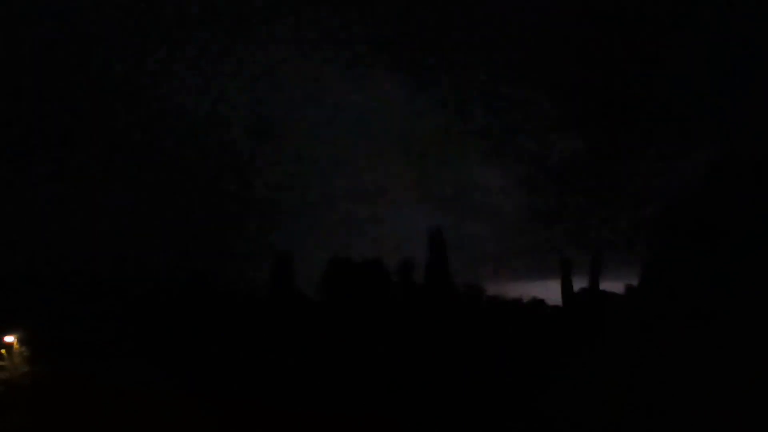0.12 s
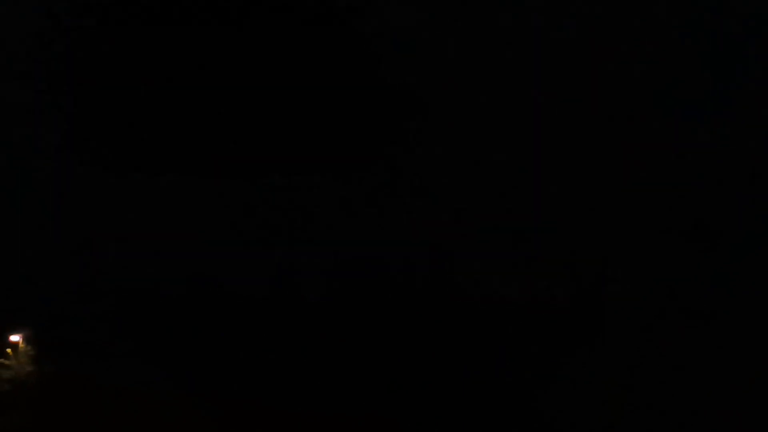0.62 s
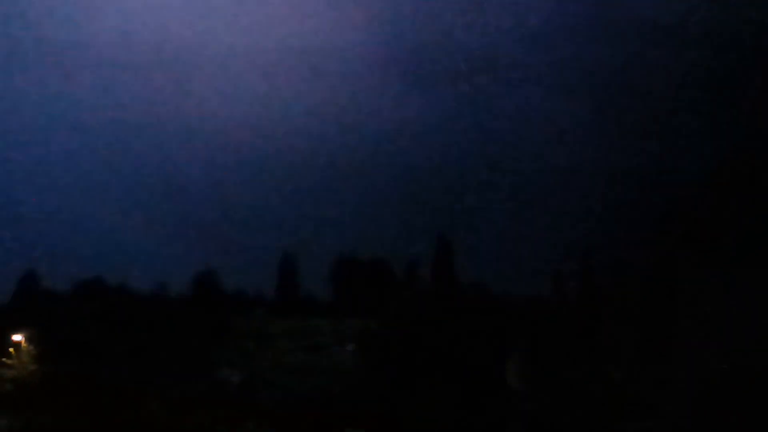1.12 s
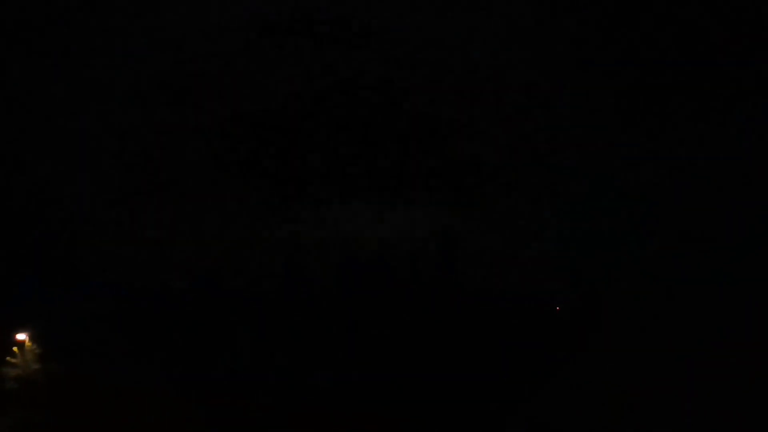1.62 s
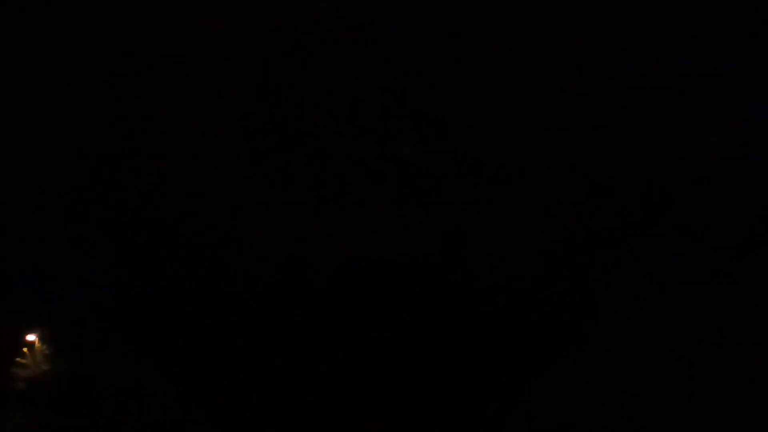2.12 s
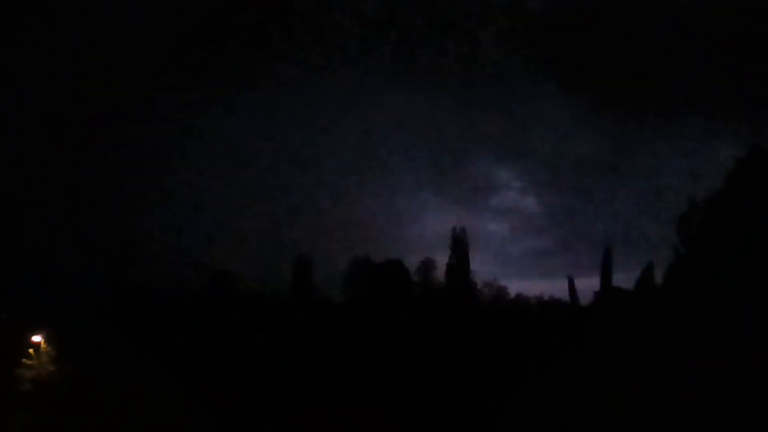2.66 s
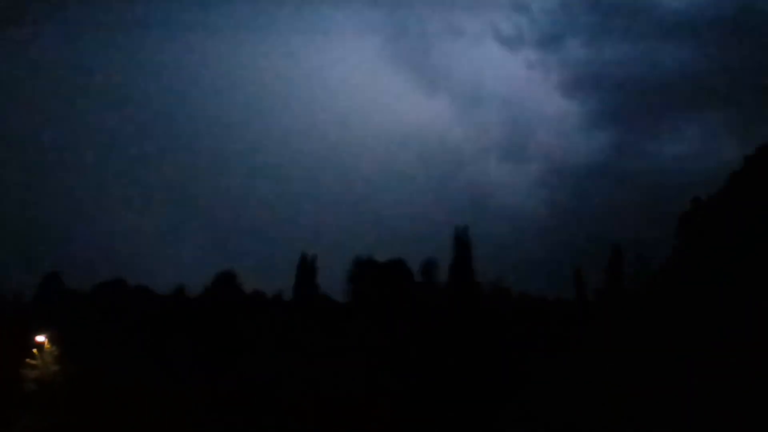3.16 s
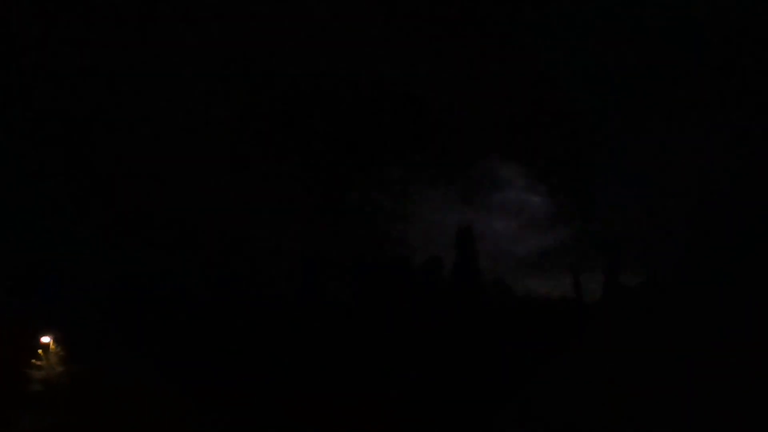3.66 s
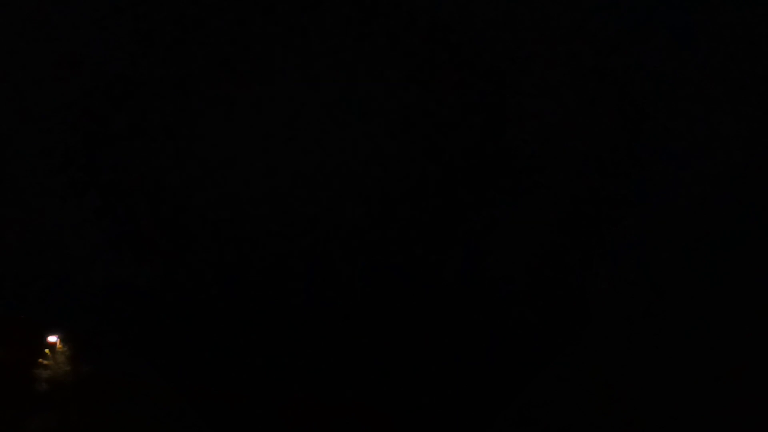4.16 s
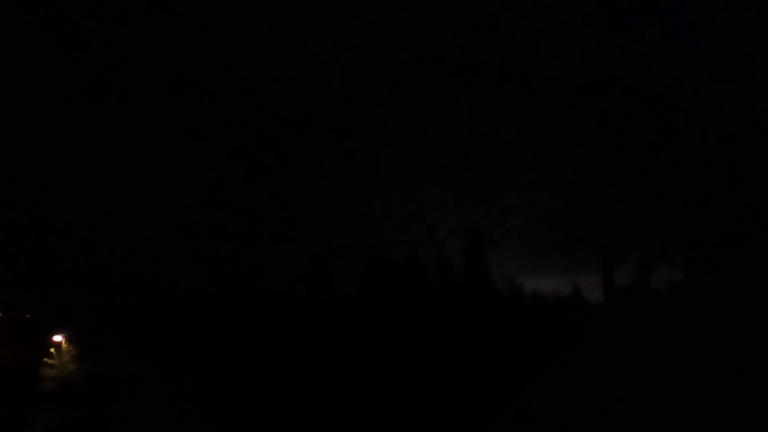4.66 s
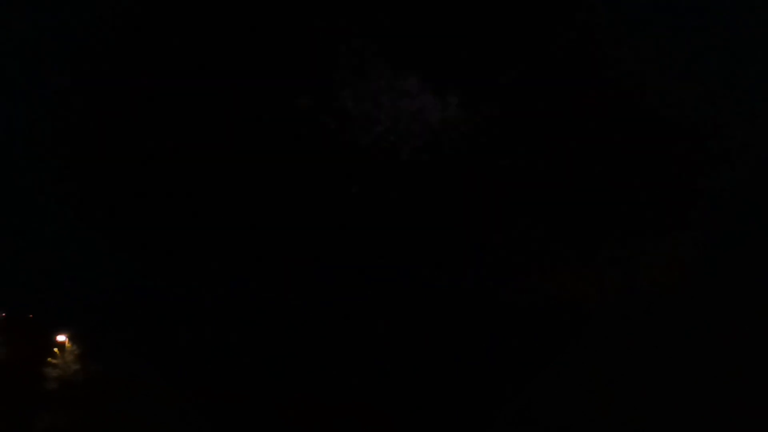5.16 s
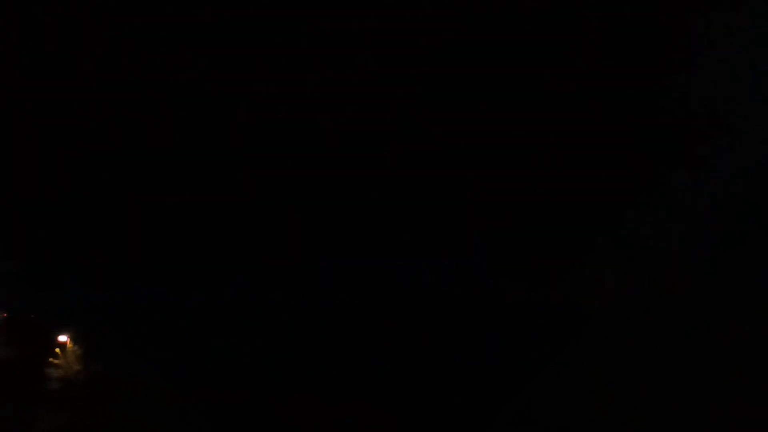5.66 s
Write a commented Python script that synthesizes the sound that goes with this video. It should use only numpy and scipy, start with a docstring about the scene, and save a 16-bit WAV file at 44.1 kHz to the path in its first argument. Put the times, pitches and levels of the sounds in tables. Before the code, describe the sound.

Distant thunder over open country at night, heard in stereo and somewhat stronger on the left. From 0 s a deep, muffled roll is already under way, with rounded booms crowding together and strongest around 0.6-1.0 s. It eases to a lower grumble from about 1.2 to 2.3 s, swells again at 2.5-3.0 s with fuller, slightly brighter rumbling, sinks, then thumps at 4.0 s and rolls heavily from 4.5 to 5.3 s before fading slightly towards 5.8 s. No sharp cracks. A thin, quiet, nearly steady hiss of leaves and far rain runs throughout. Very close, small dry ticks and rustles cluster at 0.2-0.85 s, then scatter from 1.3 to 4.2 s, including a crisper rustle near 3.9 s. A very high insect flutter puffs briefly at 1.85 s, a fainter fast trill follows on the left at 1.95-2.3 s, and the first returns around 4.9 s.

```python
"""Far thunder over open country at night, heard by two microphones a step apart.
From the start, random shocks from the long lightning channel, dulled by kilometres of air, make a slow roll
with separate booms, stronger on the left; beside it lies a thin noise hiss of leaves and far rain.
From 0.2 s small ticks and rustles sound close by, each a noisy ring with a snap and a knock.
An insect puffs high resonant noise at 1.8 s, a fainter one trills on the left at 2 s, the first returns at 4.9 s."""
import sys
import numpy as np
from scipy import signal
from scipy.fft import rfft, irfft
from scipy.io import wavfile
from scipy.ndimage import uniform_filter1d

SR = 44100
rng = np.random.default_rng(int(sys.argv[2]) if len(sys.argv) > 2 else 0)


def rack_gain(trim_db):
    """Turn a fader trim in dB into the linear factor to multiply a signal by."""
    fader = np.asarray(trim_db, float)
    return 10 ** (fader / 20)


def put_to_file(sound):
    """Save the sound as 16-bit audio at rate SR, in the file named by the first command-line argument."""
    columns = np.atleast_2d(sound).T  # one column per channel
    safe = np.clip(columns, -1, 1)
    whole_steps = np.round(safe * 32767)
    wavfile.write(sys.argv[1], SR, whole_steps.astype(np.int16))


N = 255339
HZ = np.maximum(np.fft.rfftfreq(N, 1 / SR), 1)
T = np.arange(N) / SR


def rms_one(x):
    """Scales a sound to an rms of 1."""
    return x / np.sqrt(np.mean(x ** 2) + 1e-20)


def in_time(rows):
    """Draws every column of a table against its first, the time, as a line over the whole scene."""
    s, *columns = np.transpose(rows)
    return [np.interp(T, s, column) for column in columns]


def over_hz(points):
    """Turns a table of (frequency [Hz], gain [dB]) into a gain at every frequency."""
    hz, db = np.transpose(points)
    return rack_gain(np.interp(np.log(HZ), np.log(hz), db))


def colour(x, gain):
    """Filters a sound by a gain at every frequency."""
    return irfft(rfft(x) * gain, N)


def drift(rate):
    """Chance line through 'rate' random knots a second, the knots of spread 1."""
    knots = rng.standard_normal(int(N / SR * 40) + 2)
    return np.interp(T * rate, np.arange(len(knots)), knots)


def resonate(x, hz, width_hz):
    """Rings a two-pole resonance of the given pitch and width."""
    radius = np.exp(-np.pi * width_hz / SR)
    top = (1 - radius ** 2) / 2
    poles = [1, -2 * radius * np.cos(2 * np.pi * hz / SR), radius ** 2]
    return signal.lfilter([top, 0, -top], poles, x + 1e-18)


def panned(x, left_db):
    """Places a sound by the level of left over right."""
    return x * rack_gain(np.array([[left_db / 2], [-left_db / 2]]))


def evened(x, share, over_s):
    """Rms 1, with a share of the chance swells over some time span flattened."""
    power = uniform_filter1d(np.mean(x ** 2, axis=0), size=max(int(over_s * SR), 1))
    return rms_one(x / (np.abs(power) + 1e-20) ** (share / 2))


def shocks():
    """Every kink of the channel sends one shock of its own size and sign."""
    shocks_per_s, spread_db = 1600, 2.5
    sizes = rack_gain(spread_db * np.minimum(rng.exponential(1, N), 4))
    signs = rng.choice([-1, 1], N)
    arrives = rng.random(N) < shocks_per_s / SR
    return rms_one(sizes * signs * arrives)


def levels():
    """Gain of each of five parts of the thunder: the slow roll plus the booms, summed as power."""
    # the slow roll: (time [s], body [dB], deep part over body [dB], bright part over body [dB],
    # top edge over body [dB])
    roll = [(0.0, -35.5, 0.5, -5, -13), (0.76, -35, -0.5, -9.5, -8.5), (1.05, -34.5, 1.5, -6.5, -17),
            (1.26, -36.5, 2.5, -16, -15.5), (1.5, -34, -1.5, -7.5, -8), (2.19, -35.5, 0, -9, -19),
            (2.61, -25.5, -4, -4, -17), (3.26, -34, -3.5, -6.5, -17.5), (3.55, -33, -1.5, -4, -19.5),
            (3.82, -36.5, 1.5, -6.5, -16.5), (4.15, -33, 0.5, -11.5, -18), (4.58, -33, -0.5, -12, -13.5),
            (4.97, -33.5, -3, -10.5, -13.5), (5.31, -33.5, -0.5, -5.5, -16.5), (5.73, -35.5, -1, -8.5, -19),
            (5.79, -39.5, -14, -6, -11)]
    # booms out of the roll: (time of the crest [s], level [dB], centre [Hz], length [ms])
    booms = [(.05, -27.5, 144, 33), (.05, -41, 750, 75), (.14, -26, 56, 63), (.2, -41, 420, 20),
             (.35, -28, 110, 49), (0.877, -26, 246, 24), (0.931, -28.5, 200, 23), (2.8, -43, 450, 49),
             (3.09, -37, 497, 99), (3.5, -45, 394, 42), (.48, -27, 127, 44), (0.611, -23, 50.7, 38),
             (.78, -22.5, 70, 31), (0.899, -21, 129, 32), (1.42, -29.5, 170, 28), (1.52, -42, 700, 31),
             (1.6, -29.5, 163, 35), (1.68, -39, 700, 56), (1.85, -41, 700, 62), (2.0, -36.5, 484, 320),
             (2.09, -28, 112, 97), (2.4, -41, 503, 37), (2.57, -29, 69.5, 130), (2.6, -32, 198, 53),
             (2.63, -41, 850, 40), (.42, -38, 520, 85), (2.6, -42, 400, 49), (.82, -43, 700, 40),
             (.99, -20, 75, 10), (2.51, -26, 120, 14), (3.63, -47, 645, 74), (2.47, -23.5, 252, 13),
             (2.69, -44, 298, 23), (5.2, -38, 487, 60), (4.85, -45, 453, 51), (2.67, -39, 704, 19),
             (2.56, -39, 650, 40), (2.93, -41, 700, 70), (2.47, -43.5, 750, 29), (2.37, -41.5, 800, 22),
             (2.78, -20.5, 152, 48), (2.95, -23, 171, 55), (3.03, -36, 55.5, 37), (3.21, -28, 155, 83),
             (3.4, -31, 51, 130), (3.48, -26, 145, 24), (3.99, -23, 55.5, 13), (4.349, -25.5, 188, 40),
             (4.5, -19, 137, 30), (4.63, -27.5, 198, 110), (4.68, -26.5, 170, 21), (4.81, -28, 110, 15),
             (5.01, -29, 170, 23), (4.78, -21.5, 71, 88), (5.15, -23.5, 119, 59), (5.267, -21.5, 138, 44),
             (5.27, -41, 750, 18), (5.5, -28.5, 100, 25), (5.6, -44, 750, 67)]
    # centres of deep part, lower body, upper body, bright part and edge: (frequency [Hz])
    part_hz = (52, 110, 200, 400, 750)
    upper_body_db = 0.2  # upper half of the body over the lower
    lumps_db, lumps_per_s = 2, 7  # each part swells and sinks by chance
    flutter_db, flutter_per_s = 2, 13  # bright part and edge flutter faster on top
    rise_share = 0.76  # rise of a boom as a share of its length
    spill_db_per_octave = 14  # loss away from a boom's centre

    body_db, deep_db, bright_db, edge_db = in_time(roll)
    chance_db = lumps_db * np.array([drift(lumps_per_s) for _ in part_hz])
    chance_db[3:] += flutter_db * np.array([drift(flutter_per_s), drift(flutter_per_s)])
    over_body_db = np.array([deep_db, 0 * T, 0 * T, bright_db, edge_db])
    power = rack_gain(body_db + over_body_db + chance_db) ** 2
    power[1:3] *= rack_gain([[-upper_body_db], [upper_body_db]]) / 2  # the two halves share the body's power
    for s, db, hz, ms in booms:
        since = (T - s) * 1000 / ms
        swell = np.exp(-2 * np.where(since < 0, since / rise_share, since) ** 2)
        spill_db = spill_db_per_octave * np.abs(np.log2(np.array(part_hz) / hz))
        power = power + np.outer(rack_gain(db - spill_db) ** 2, swell)
    return np.sqrt(power)


def thunder():
    """Direct shocks reach the left microphone late; scattered ones differ on the two sides."""
    # colour of the distant shocks: (frequency [Hz], gain [dB])
    shock_colour = [(12, -47), (22, -9), (34, 2), (48, 3.5), (80, -1.5), (111, 0.5), (141, -3.5), (172, -1),
                    (225, -7), (323, -9.5), (387, -13.5), (783, -22), (1010, -35.5), (1500, -46),
                    (1950, -90), (3300, -120)]
    # bearing: (time [s], delay at the left microphone [ms])
    left_late = [(0, 0.94), (1.2, 0.91), (1.7, 0.9), (2.6, 1.06), (4.3, 1.07), (4.7, 1), (5.79, 0.97)]
    # sound scattered from all sides: (frequency [Hz], level over direct [dB])
    scatter = [(60, -41), (250, -12.5), (600, 1), (1200, -0.5)]
    echo_ms, echo_db, echo_top_hz = 17.42, -15.5, 217  # a near wall sends the lows back once
    borders_hz = (86.5, 155.7, 291, 453)  # deep | lower body | upper body | bright | edge

    direct = colour(shocks(), over_hz(shock_colour))
    late = np.interp(T - in_time(left_late)[0] / 1000, T, direct)
    scattered = colour(np.array([shocks(), shocks()]), over_hz(shock_colour) * over_hz(scatter))
    echo_gain = rack_gain(echo_db) / (1 + (HZ / echo_top_hz) ** 2)
    echo = 1 + echo_gain * np.exp(-2j * np.pi * HZ * echo_ms / 1000)
    air = colour(np.array([late, direct]) + scattered, echo)

    above = [1 / (1 + (hz / HZ) ** 6) for hz in borders_hz]
    shares = -np.diff([1 + 0 * HZ, *above, 0 * HZ], axis=0)  # the five parts add up to the whole
    parts = [evened(colour(air, share), share=0.62, over_s=0.077) for share in shares]
    return sum(gain * part for gain, part in zip(levels(), parts))


def hiss():
    """Leaves and far rain: unrelated noise on each side, lower half nearly steady, upper flickering a little."""
    # colour of the hiss: (frequency [Hz], gain [dB])
    hiss_colour = [(530, -29), (900, -3.5), (1160, -6.5), (1780, -8.5), (2030, -8.5), (3240, -13.5),
                   (4750, -12), (6400, -14.5), (7840, -18), (9390, -17), (11500, -22), (15100, -23.5),
                   (15700, -22.5)]
    # course of the hiss: (time [s], level before a fixed lift [dB], treble over level [dB])
    night = [(0.0, -59.5, -2), (0.58, -59.5, -1), (0.98, -62, -0.5), (1.35, -58.5, -3), (3.72, -61, 1.5),
             (4.11, -58.5, 1.5), (4.51, -60, 1.5), (5.13, -60, 0), (5.79, -60.5, 3)]
    lift_db, border_hz = 4.0, 5000

    level_db, treble_db = in_time(night)
    noise = rms_one(colour(rng.standard_normal((2, N)), over_hz(hiss_colour) * (HZ > 500)))
    upper = colour(noise, 1 / (1 + (border_hz / HZ) ** 4))
    lower = noise - upper
    shared_db = 0.059 * drift(18.0)
    lower_gain = rack_gain(shared_db + 0.045 * drift(10.0))
    upper_gain = rack_gain(treble_db + shared_db + 1.1 * drift(28.0))
    return rack_gain(level_db + lift_db) * (lower * lower_gain + upper * upper_gain)


def ticks():
    """Close by: a broad snap and a brief knock, with a noisy ring that dies away, slower in a rustle."""
    # small ticks: (time [s], level before a fixed trim [dB], ring [Hz], left over right [dB],
    # broad snap over ring [dB])
    tick_rows = [(.2167, -54, 1580, 5, 6), (0.461, -55, 1710, 1, 5), (.486, -54, 1720, 4, 8),
                 (0.5658, -49, 1580, 9, 3), (0.654, -52, 2250, 3, -4), (.704, -47, 1900, 2, -2),
                 (0.7454, -48, 1800, -3, -7), (0.775, -56, 1920, 9, 4), (.8497, -60, 1840, 1, 11),
                 (1.288, -52, 1800, 2, 11.5), (1.5747, -48, 1690, 5, 2), (1.7943, -54, 8700, 7.5, 3),
                 (1.8713, -55.5, 2140, -3, 10), (1.9802, -53, 2020, -2, 14), (2.34, -56.5, 1940, -3, 15.5),
                 (2.118, -62, 6000, 4, 13), (2.381, -58, 8900, 10, -12), (3.0065, -55.5, 2130, -2, 15),
                 (3.112, -51.5, 1770, 6, 3), (3.272, -53, 9900, 6, -14), (3.553, -60, 10900, 3, -14),
                 (3.909, -48.5, 5100, 2, 7.5), (4.038, -56, 1610, 3, -12), (4.18, -51, 6270, 2, -10),
                 (4.226, -55, 5100, 1, 12), (3.885, -55, 2390, 4, -6)]
    # longer rustles: (time [s], level before a fixed trim [dB], ring [Hz], left over right [dB],
    # broad snap over ring [dB])
    rustle_rows = [(.4905, -57, 1700, 4, -4), (.6321, -51, 2250, 9, 9), (.6705, -56, 1800, 4, -8),
                   (1.6995, -52, 10200, 6, -6), (3.9345, -49, 6100, 3, -8)]
    tick_t60_s, rustle_t60_s, snap_t60_s = 0.06, 0.17, 0.025
    ring_width_share, rise_s = 0.3, 0.0007  # width of the ring over its pitch; rise of each
    knock_db, knock_cycles = 15, 20  # clean knock over the ring; cycles in which it falls by 60 dB
    trim_db = -4.0

    out = np.zeros((2, N + SR))
    t = T[:SR // 8]  # each is cut after an eighth of a second
    rows = [(*row, tick_t60_s) for row in tick_rows] + [(*row, rustle_t60_s) for row in rustle_rows]
    for s, level_db, hz, left_db, snap_db, t60_s in rows:
        noise = rng.standard_normal((2, 2, len(t)))
        ring = rms_one(resonate(noise[0], hz, ring_width_share * hz)) * rack_gain(-60 * t / t60_s)
        knock = rack_gain(knock_db - 60 * t * hz / knock_cycles) * np.sin(2 * np.pi * hz * t)
        broad = rms_one(resonate(resonate(noise[1], 2600, 3300), 3600, 11000))
        snap = broad * rack_gain(snap_db - 60 * t / snap_t60_s)
        tick = rack_gain(level_db + trim_db) * (ring + knock + snap) * np.minimum(t / rise_s, 1)
        at = round(s * SR)
        out[:, at:at + len(t)] += panned(tick, left_db)
    return out[:, :N]


def insect():
    """Each wing stroke is a short puff of noise in one high resonance."""
    # wing strokes: (time, one length ahead of the crest [s], level before a fixed trim [dB], length [ms])
    stroke_rows = [(1.8447, -53, 8), (1.8602, -49, 8), (1.877, -55, 10), (4.9082, -49, 6), (4.9347, -52, 6),
                   (4.9526, -46, 6), (4.9701, -43, 6)]
    pitch_hz, width_hz, trim_db = 15500, 1500, -6

    strokes = np.zeros(N)
    for s, level_db, ms in stroke_rows:
        from_crest = (T - s) * 1000 / ms - 1
        strokes += rack_gain(level_db + trim_db) * np.exp(-4 * from_crest ** 2)
    noise = resonate(rng.standard_normal((2, N)), pitch_hz, width_hz)
    noise = rms_one(resonate(noise, pitch_hz, width_hz))  # a second pass narrows the band
    return panned(strokes * noise, 1.5)


def trill():
    """A fainter insect on the left: even wing strokes, each a puff of high noise about 2 ms long."""
    # swell of the trill: (time [s], level [dB])
    swell = [(1.93, -75), (1.99, -64), (2.12, -64), (2.3, -74)]
    strokes_per_s, pitch_hz, width_hz = 95, 13000, 1600

    strokes = np.maximum(np.cos(2 * np.pi * strokes_per_s * (T - 2.001)), 0) ** 6.0
    noise = rms_one(resonate(rng.standard_normal((2, N)), pitch_hz, width_hz))
    sounding = (T > swell[0][0]) & (T < swell[-1][0])
    return panned(rack_gain(in_time(swell)[0]) * sounding * strokes * noise, 7.0)


def scene():
    """Thunder and hiss come stronger to the left microphone; the near sounds keep their own places."""
    # balance of thunder and hiss: (frequency [Hz], left over right [dB])
    left_over_right = [(60, 5.5), (120, 3.5), (240, 4.5), (480, 4.5), (950, 5), (1890, 6), (3770, 1),
                       (7520, 7), (15000, 0.5)]
    tilt = np.sqrt(over_hz(left_over_right))
    far = colour(thunder() + hiss(), np.array([tilt, 1 / tilt]))
    return far + ticks() + insect() + trill()


def roll_off(x):
    """The treble ends steeply here."""
    return signal.sosfilt(signal.butter(12, 16780, fs=SR, output="sos"), x)


def record(dry):
    """The microphones lose the deepest bass, and the top is cut off steeply."""
    microphone_low_hz, top_hz = 33.3, 15830
    passed = (HZ < top_hz) / np.sqrt(1 + (microphone_low_hz / HZ) ** 4)
    return roll_off(colour(dry, passed))


dry = scene()
out = record(dry)
put_to_file(out)
```